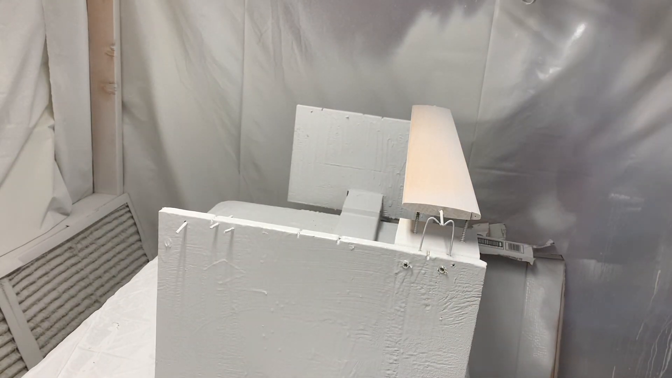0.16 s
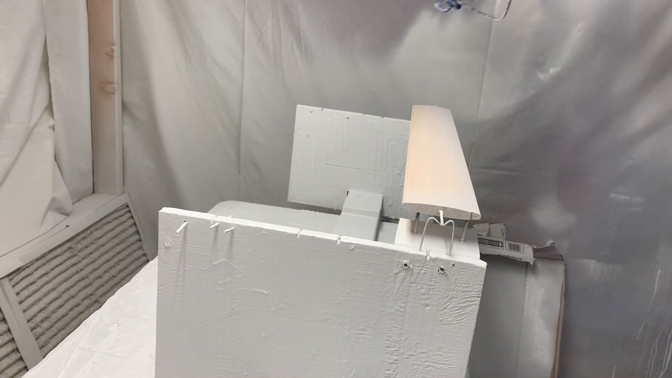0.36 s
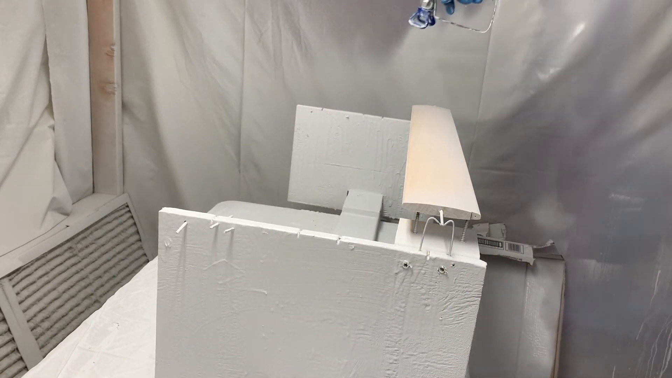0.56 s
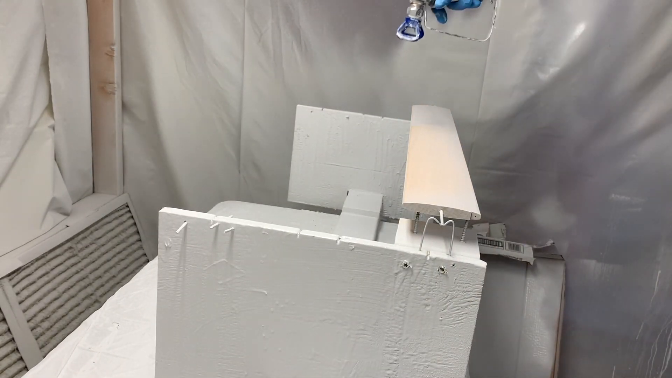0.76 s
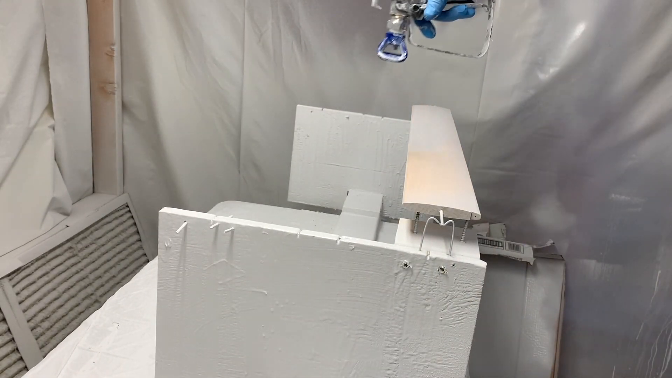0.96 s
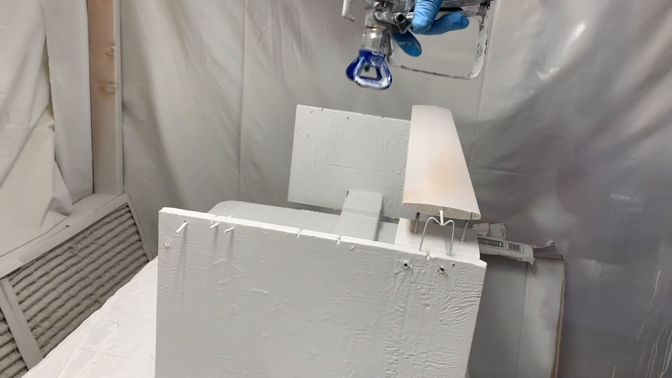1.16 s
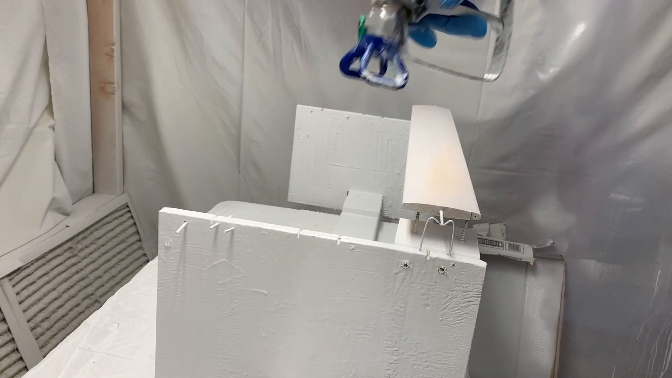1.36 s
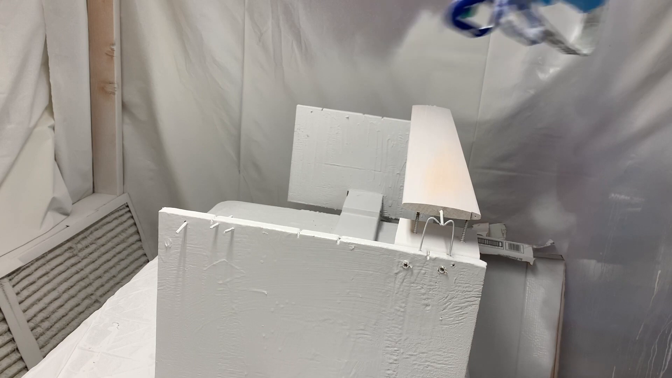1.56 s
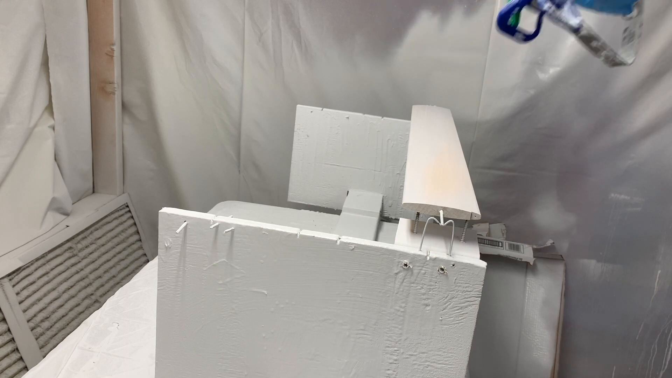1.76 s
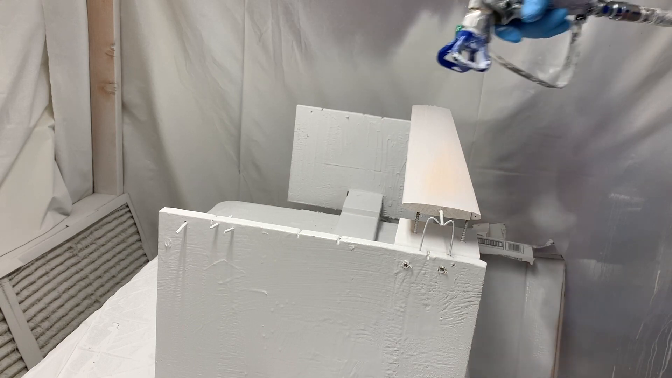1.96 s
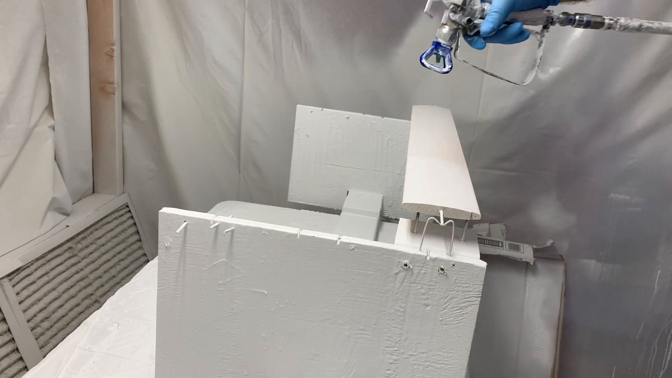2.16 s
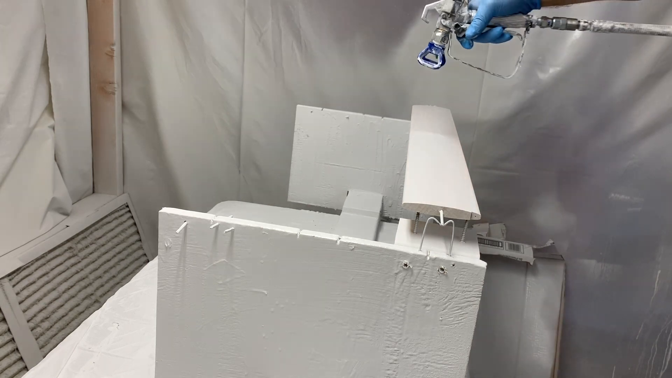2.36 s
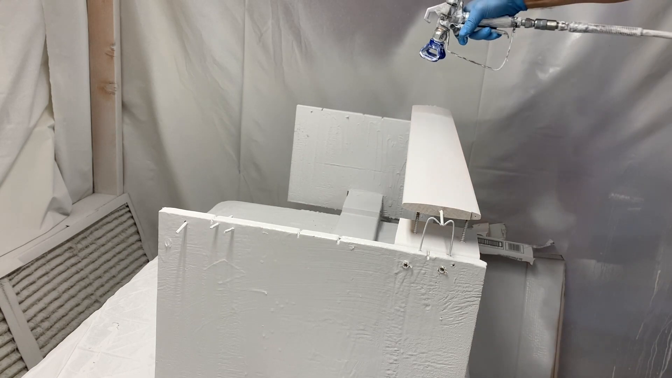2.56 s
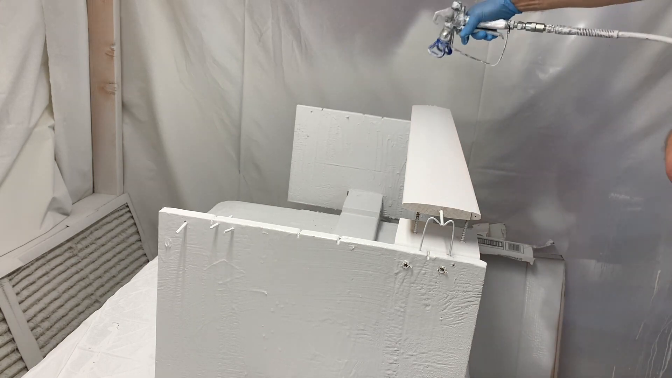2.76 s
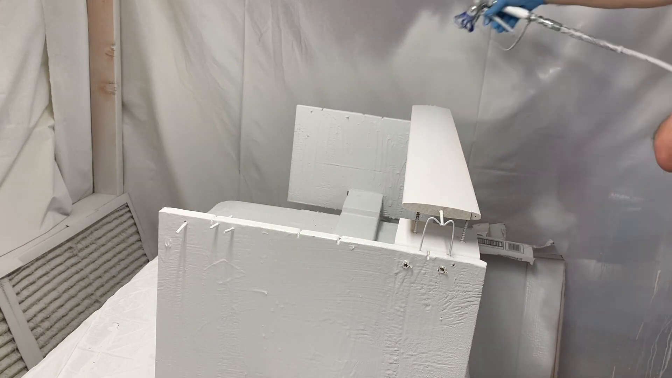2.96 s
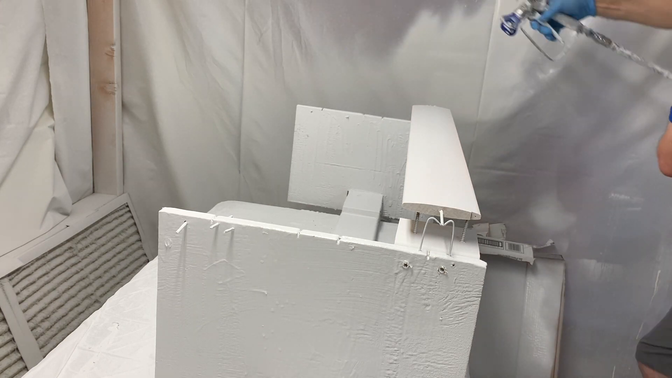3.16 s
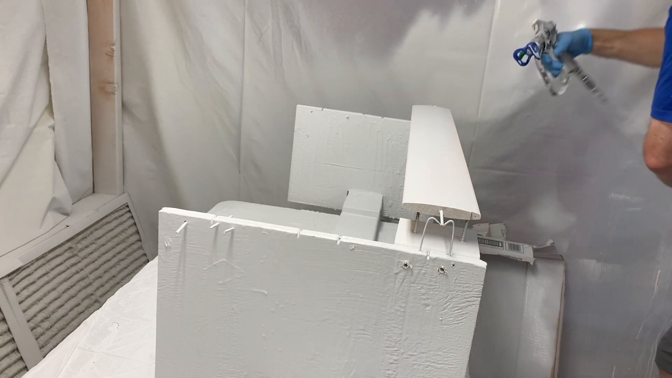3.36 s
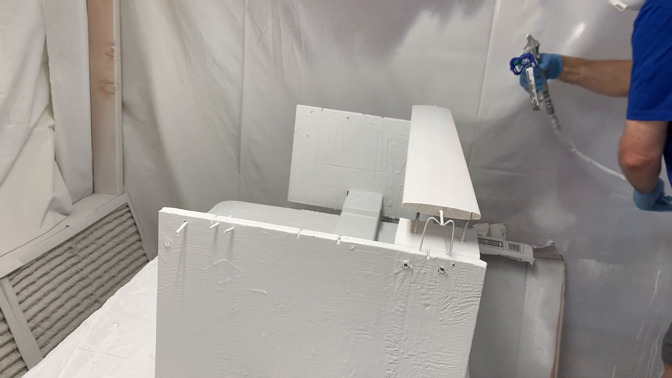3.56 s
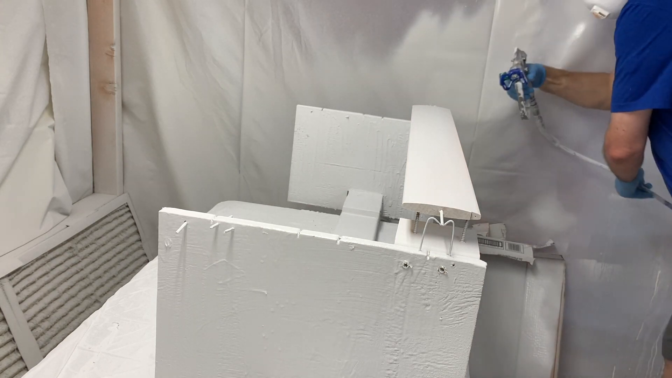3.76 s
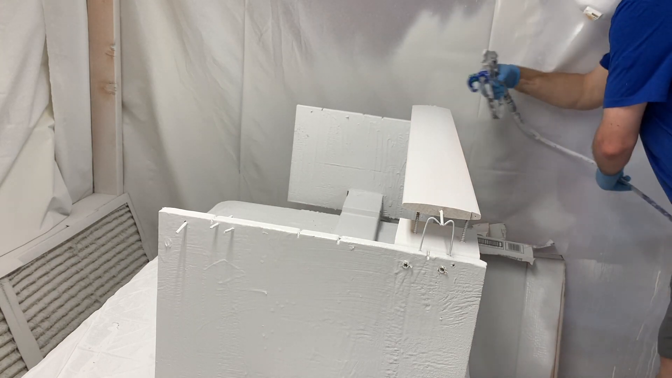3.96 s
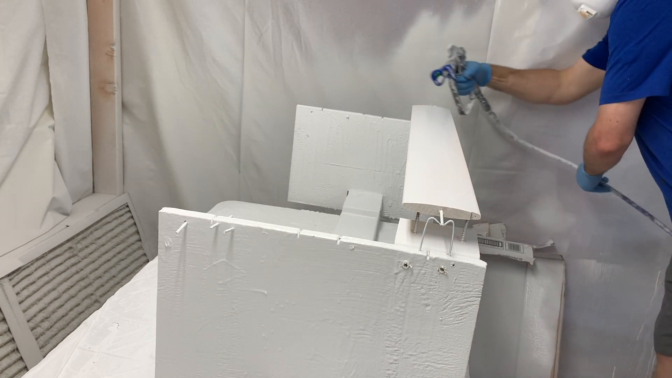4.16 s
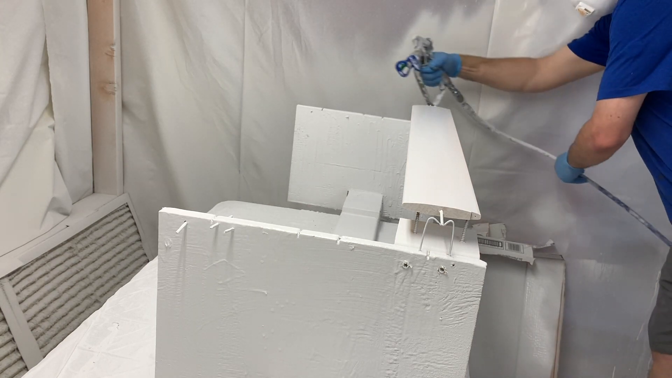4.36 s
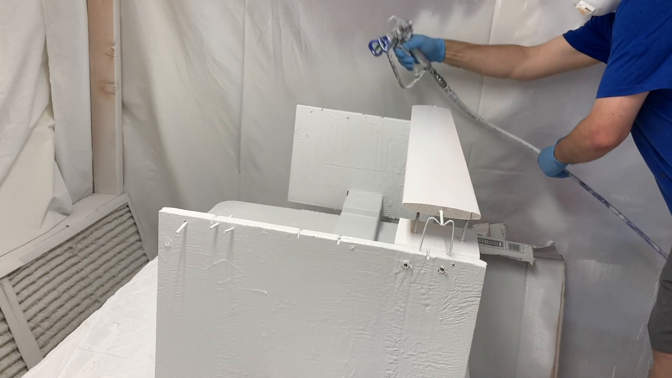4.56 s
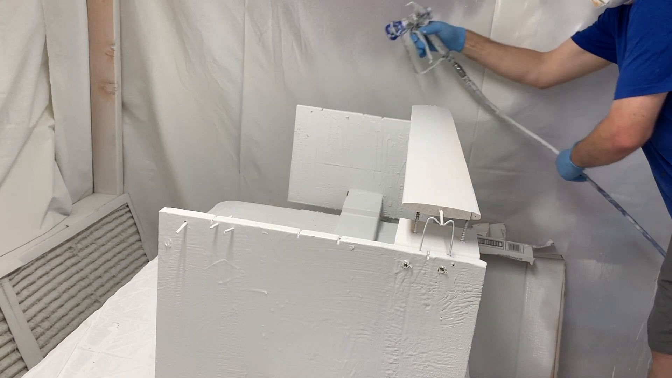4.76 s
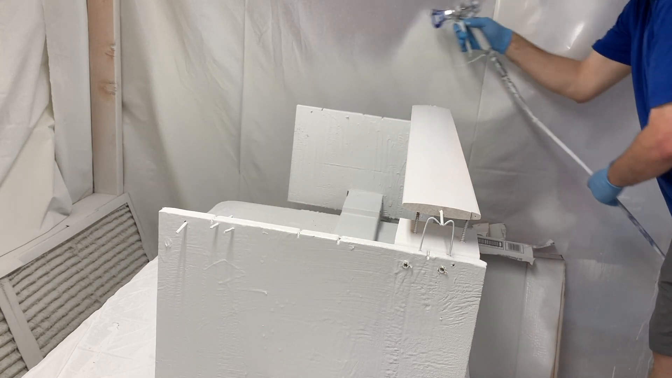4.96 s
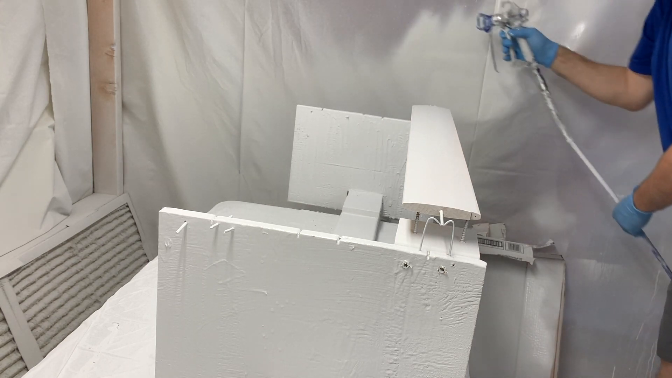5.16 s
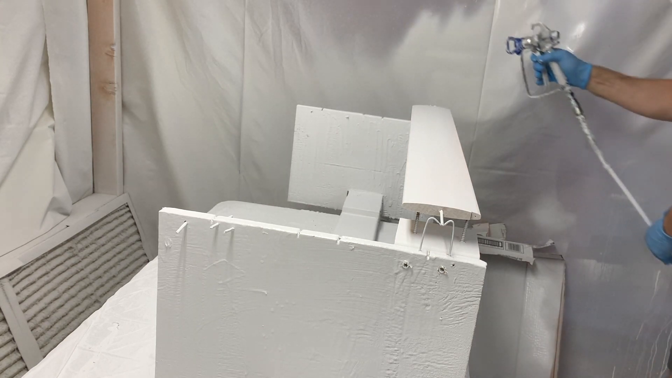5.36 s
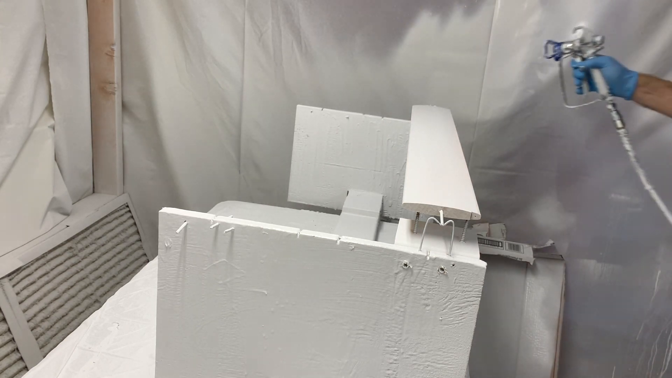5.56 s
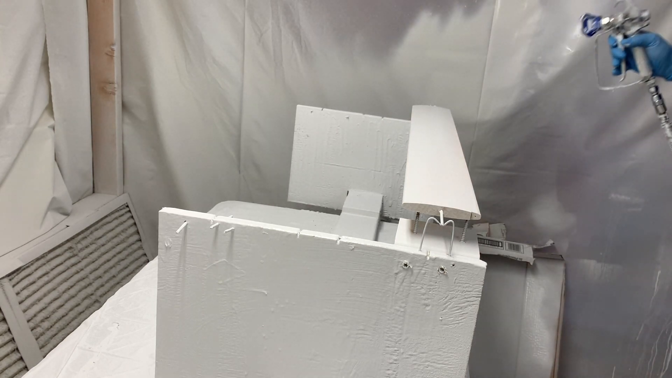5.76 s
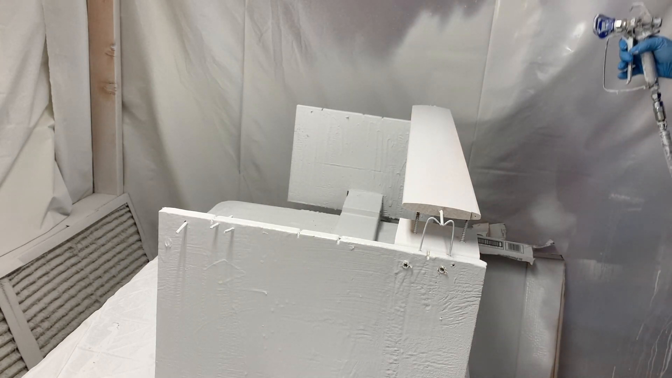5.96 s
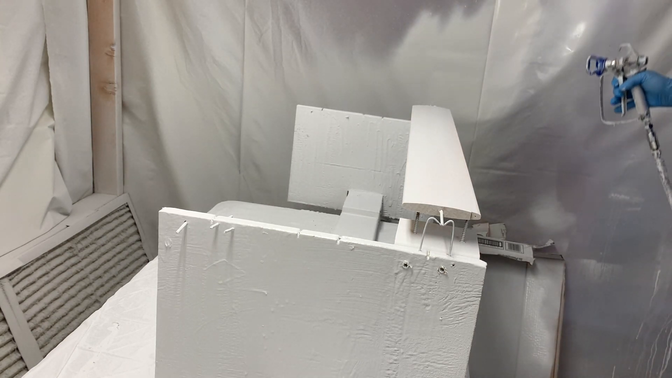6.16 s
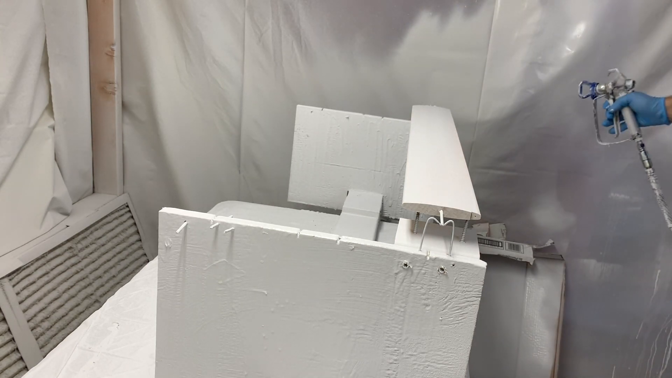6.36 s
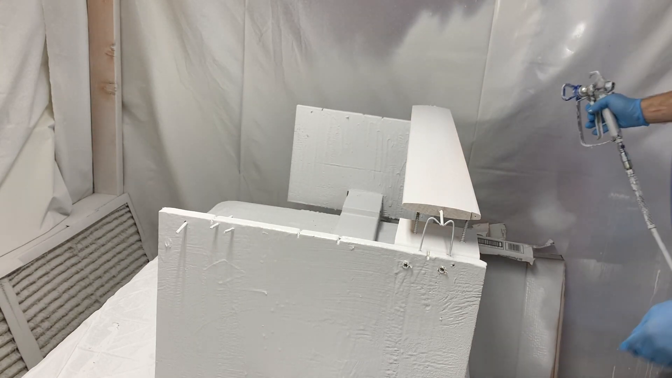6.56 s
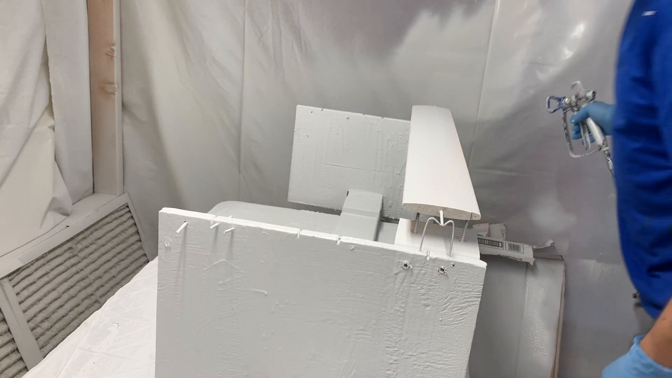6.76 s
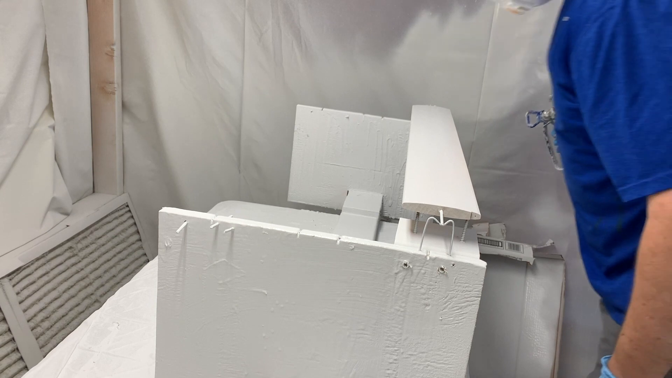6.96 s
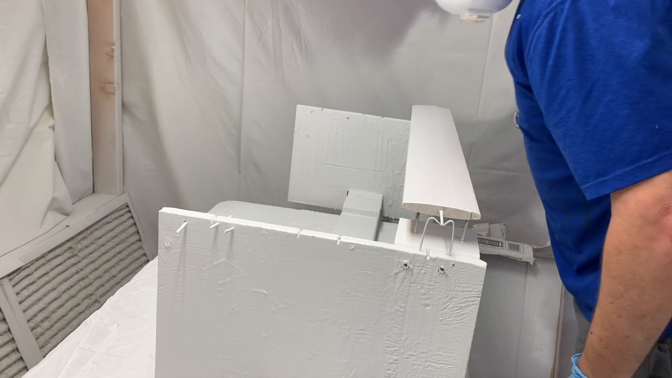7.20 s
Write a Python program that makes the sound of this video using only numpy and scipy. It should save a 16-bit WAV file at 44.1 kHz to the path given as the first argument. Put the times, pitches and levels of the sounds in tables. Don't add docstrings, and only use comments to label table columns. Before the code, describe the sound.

In a plastic-lined booth with a steady fan hum, sharp spray jets start and stop, drumming a board, followed by hose knocks, rustles and trigger clicks.

```python
import sys
import numpy as np
from scipy import signal
from scipy.io import wavfile
from scipy.ndimage import uniform_filter1d

SR = 44100
rng = np.random.default_rng(int(sys.argv[2]) if len(sys.argv) > 2 else 0)


def pcm_store(signal):
    levels = np.round(np.clip(np.atleast_2d(signal), -1, 1) * 32767)
    wavfile.write(sys.argv[1], SR, levels.astype(np.int16).T)


def attenuation_scalar(level_db):
    decades = np.asarray(level_db, float) / 20
    return 10 ** decades


N = 318843
T = np.arange(N) / SR

# (time [s], level over the jet [dB])
SPURTS = [
    (.3125, 5.),
    (1.8165, 8.),
    (3.9865, 10.),
]
# (time [s], level [dB], pitch [Hz], decay by 60 dB [s])
CLICKS = [
    (3.837, -46, 4000, .05),
    (3.9033, -27, 1300, 0.09),
    (6.2235, -40, 3300, 0.03),
]


def jet():
    # (open [s], rise [s], shut [s], dying [dB/s], treble gained while dying [dB/octave/s])
    passes = [
        (0.313, 0.018, 1.412, 704, 200),
        (1.8179, 0.0066, 2.85, 260, 7),
        (3.9875, 0.04, 4.62, 285, 15),
    ]
    # (time [s], level [dB])
    nearness = [(0.3, -30.5), (1.08, -27.5), (1.38, -23), (1.45, -26), (2.04, -24), (2.08, -27.5),
                (2.44, -29), (2.57, -28.5), (4.05, -28.5), (4.24, -26.5), (4.36, -28), (4.6, -28)]
    # (frequency [Hz], level [dB])
    hiss = [(300, -32), (1000, -29.5), (2000, -25.5), (3000, -20.5), (4500, -17), (6000, -10), (8000, -6.5),
            (11000, -2), (14000, -0.5), (15800, 2)]
    cracked_open_db, dribble_db, dribble_fall_db_per_s = -10, -22, 180
    tilt = -1.68
    gains = []
    for start, rise, shut, fall_db, thinning in passes:
        gains.append(attenuation_scalar(held_db(start, rise, shut, fall_db, cracked_open_db)))
        gains.append(attenuation_scalar(dribble_db + held_db(shut, .01, shut, dribble_fall_db_per_s, 0)))
        dying = (T > shut) & (T < shut + .2)
        tilt = tilt + thinning * (T - shut) * dying
    level_db = np.interp(T, *np.transpose(nearness)) + summed_db(np.array(gains), -120)
    for s, db in SPURTS:
        level_db = level_db + db * (T >= s) * np.exp(-np.abs(T - s) / .012)
    droplets = grains(2500, 2.4, 0.19)
    spray = coloured(droplets, hiss, size=256, tilt=np.clip(tilt, -3, 14), pivot_hz=10500, patchy_db=0.32)
    return attenuation_scalar(level_db + 7.5) * spray


def board():
    # (lands [s], rise [s], leaves [s], level [dB], fading [dB/s])
    strikes = [
        (0.62, 0.078, 1.08, -33.5, 93),
        (2.399, 0.059, 2.756, -33, 61),
    ]
    # (frequency [Hz], width [Hz], level [dB])
    mode_table = [(380.5, 25, -2.5), (540, 76, -2), (807, 210, 0), (1025, 260, 5), (1184, 87, 2),
                  (1610, 53, -19.5), (1830, 34, -30), (2350, 170, -28), (2950, 250, -13), (3860, 570, -44)]
    # (time [s], frequency [Hz])
    glide = [
        [(.66, 1590), (.755, 1580), (.81, 1730), (.855, 1690), (.91, 1430), (.95, 1210), (1.04, 1080),
         (1.13, 1210), (1.2, 1100)],
        [(2.43, 1520), (2.51, 1610), (2.55, 1830), (2.585, 1740), (2.62, 1610), (2.67, 1280), (2.73, 1140),
         (2.83, 1200), (2.93, 1030)],
    ]
    # (peak [s], singing level [dB], rise [s], fall [s])
    gust_table = [
        (0.676, -39, 0.019, 0.045),
        (0.754, -29.5, 0.0093, 0.2),
        (0.848, -21.5, 0.029, 0.078),
        (0.96, -25, 0.024, 0.023),
        (2.512, -26, 0.028, 0.014),
        (2.565, -26, .03, 0.037),
        (2.616, -22.5, 0.025, 0.0085),
        (2.642, -25, 0.0068, 0.038),
        (2.716, -28, .016, .11),
    ]
    landing_db, sing_db, gust_share = -18.5, -6.5, 0.45
    body_db, body_fade_db_per_s = 2.5, 11.5
    blow = sum(attenuation_scalar(db + held_db(start, rise, end, fall_db, landing_db))
               for start, rise, end, db, fall_db in strikes)
    since_landing = np.min([np.where(T > row[0], T - row[0], 9) for row in strikes], axis=0)
    surge = np.sqrt((swells(gust_table) ** 2).sum(0))
    flutter = evened(uniform_filter1d(uniform_filter1d(rng.standard_normal(N), 500), 500))
    drive = rng.standard_normal(N) * attenuation_scalar(2.2 * flutter)
    modes = [attenuation_scalar(db) * evened(ring(drive, hz, width)) for hz, width, db in mode_table]
    note_hz = np.interp(T, *np.concatenate(glide).T)
    note = evened(resonate(resonate(drive, note_hz, 110), note_hz, 300))
    steady = blow + gust_share * uniform_filter1d(surge, 2500)
    panel = 0.32 * steady * sum(modes[3:])
    body = attenuation_scalar(body_db - body_fade_db_per_s * since_landing) * 0.61 * blow * sum(modes[:3])
    return np.hypot(attenuation_scalar(sing_db) * blow, surge) * note + panel + body


def rustle():
    # (peak [s], level [dB], rise [s], fall [s], brightness [dB/octave])
    rub_table = [(0.012, -53, 0.044, 0.067, 4), (0.166, -67, .1, 0.22, -7), (1.45, -62, .02, 0.13, 10),
                 (1.642, -54.5, 0.062, 0.12, 0), (1.792, -63, .07, .04, -3),
                 (3.022, -39, 0.013, 0.048, 1.5), (3.194, -46, 0.088, 0.031, -1.5),
                 (3.356, -49, 0.064, 0.053, 0), (3.542, -54.5, 0.11, 0.14, -1),
                 (3.842, -50, 0.01, 0.26, -1.5), (3.91, -53, 0.054, 0.063, -8),
                 (4.87, -63, 0.14, 0.44, 5.5), (5.06, -64, .09, 0.14, 12), (5.34, -46.5, 0.12, 0.21, 1),
                 (5.62, -45.5, 0.032, .1, -4), (5.68, -41, .1, .14, 0), (5.81, -41, 0.065, 0.084, -1),
                 (6.229, -51, .004, 0.044, -6.5), (6.59, -58.5, 0.028, .05, 0), (6.72, -60, .02, 0.098, 1),
                 (6.78, -60, .025, 0.049, -2), (7.05, -74, 0.089, .3, -10), (7.23, -60, 0.026, .05, -1.5)]
    # (frequency [Hz], level [dB])
    plastic = [(250, -36), (800, -2), (2000, 1), (4000, 1.5), (7000, 0.5), (11000, -5), (15800, -7)]
    rubs = swells(rub_table)
    rub_db = summed_db(rubs, -71)
    bright = np.array(rub_table)[:, -1] @ rubs ** 2 / attenuation_scalar(2 * rub_db)
    crackle = grains(882, 1.56, 1.0)
    return attenuation_scalar(rub_db + 7.5) * coloured(crackle, plastic, size=256, tilt=bright, pivot_hz=6840, patchy_db=0.5)


def knocks():
    # (time [s], level [dB], pitch [Hz], decay by 60 dB [s])
    thuds = [
        (1.245, -24.5, 197, 0.16),
        (1.266, -21, 190, 0.076),
        (1.288, -21, 290, 0.07),
        (4.19, -33.5, 264, 0.66),
        (4.29, -38.5, 400, .9),
        (4.41, -30, 210, 0.27),
        (5.789, -28, 35, 0.17),
        (6.23, -33, 202, 0.27),
    ]
    out, t = np.zeros(N + SR), T[:SR // 2]
    for s, db, hz, t60 in CLICKS:
        puff = rng.standard_normal(len(t)) * attenuation_scalar(-60 * t / t60)
        chirp_s = t + .0006 * (1 - np.exp(-t / .0006))
        tick = 3.5 * np.sin(2 * np.pi * hz * chirp_s) * np.exp(-t / .0012)
        click = tick + 2.6 * ring(puff, hz, 0.9 * hz) + 0.06 * puff
        out[round(s * SR):][:len(t)] += attenuation_scalar(db) * click
    for s, db, hz, t60 in thuds:
        body = evened(ring(ring(rng.standard_normal(len(t)), hz, .8 * hz), hz, 1.2 * hz))
        out[round(s * SR):][:len(t)] += attenuation_scalar(db - 60 * t / t60) * body * np.tanh(t / .015)
    return out[:N]


def fan():
    # (frequency [Hz], level [dB])
    roar = [(20, -43), (45, -9.5), (62, -6), (100, -10.5), (130, -8.5), (215, -7), (260, -8), (450, -7.5),
            (560, -12.5), (1280, -15.5), (2500, -24), (4400, -30.5), (7000, -39), (11000, -57),
            (15800, -66)]
    # (frequency [Hz], width [Hz], level [dB], steady share [0-1])
    hum = [(46.3, 41.7, -59, 0), (78.4, 4.6, -47, 0.89), (155, 3.3, -43.5, 0.5), (207.7, 21.6, -44.5, 0.48),
           (377.5, 21, -54.5, 0.66)]
    # (peak [s], level [dB])
    buffets = [(0.1, -47), (0.5, -52), (2.29, -40), (2.6, -41), (3.04, -47), (4.2, -50), (4.75, -40),
               (5.17, -37.5), (5.78, -41), (6.12, -41), (6.7, -56), (7.13, -47)]
    push_s, ease_s, calm_db = 0.09, 0.11, -60.5
    out = attenuation_scalar(-38) * coloured(rng.standard_normal(N), roar, size=2048, patchy_db=2.0)
    for hz, width, db, steady in hum:
        waver = evened(ring(ring(rng.standard_normal(N), hz, width), hz, 4 * width))
        tone = np.sin(2 * np.pi * hz * T + 0.52 * waver)
        out += attenuation_scalar(db) * ((1 - steady) * waver + 2.05 * steady * tone)
    push = evened(ring(ring(rng.standard_normal(N), 31.9, 24.6), 32, 25.3))
    push_db = summed_db(swells([(s, db, push_s, ease_s) for s, db in buffets]), calm_db)
    return out + attenuation_scalar(push_db - 1.5) * push


def booth(x):
    tail = rng.standard_normal(SR // 3) * attenuation_scalar(-60 * T[:SR // 3] / 0.24)
    return x + attenuation_scalar(-7.5) * signal.oaconvolve(x, tail / np.linalg.norm(tail))[:N]


def evened(x):
    return x / np.sqrt(np.mean(x ** 2) + 1e-20)


def read(points, hz):
    f, value = np.transpose(points)
    return np.interp(np.log(hz + 1), np.log(f + 1), value)


def ring(x, hz, width):
    return signal.lfilter(*signal.iirpeak(hz, hz / width, SR), x)


def resonate(x, hz, width):
    turn = np.exp(2j * np.pi * np.cumsum(hz * np.ones(len(x))) / SR)
    r = np.exp(-np.pi * width / SR)
    return 2 * (turn * signal.lfilter([1 - r], [1, -r], x / turn + 1e-18)).real


def coloured(x, spectrum, size, tilt=0, pivot_hz=1000, patchy_db=0):
    hz, t, z = signal.stft(x, SR, nperseg=size, noverlap=size * 3 // 4)
    shape = attenuation_scalar(read(spectrum, hz))[:, None]
    patches = evened(uniform_filter1d(uniform_filter1d(rng.standard_normal(z.shape), 5, 0), 24, 1))
    octaves = np.log2(np.maximum(hz[:, None], 1500) / pivot_hz)
    slope_db = octaves * np.interp(t, T, tilt + 0 * T)
    gain = attenuation_scalar(np.clip(slope_db, -30, 30) + patchy_db * patches)
    z = z * shape / np.sqrt(np.mean(shape ** 2)) * gain
    return signal.istft(z, SR, nperseg=size, noverlap=size * 3 // 4)[1][:N]


def grains(per_s, spread_db, share):
    ticks = attenuation_scalar(spread_db * np.minimum(rng.exponential(1, N), 5)) * (rng.random(N) < per_s / SR)
    return evened(rng.standard_normal(N) + share * evened(ticks * rng.choice([-1, 1], N)))


def swells(rows):
    return np.array([attenuation_scalar(db - 13 * np.maximum((s - T) / rise, (T - s) / fall))
                     for s, db, rise, fall, *_ in rows])


def summed_db(gains, floor_db):
    return 10 * np.log10((gains ** 2).sum(0) + attenuation_scalar(2 * floor_db))


def held_db(start, rise, end, fall_db, from_db):
    shape = from_db * np.clip(1 - (T - start) / rise, 0, 1) - fall_db * np.maximum(T - end, 0)
    return np.where(T < start, -150, np.maximum(shape, -150))


def starve(x):
    # (from [Hz], to [Hz], bin level [dB], band level [dB])
    starved = (1701.5, 5800, -12.5, -13)
    # (from [Hz], band level [dB])
    hush = (10000, -103)
    lead = 342
    frames = dict(window="cosine", nperseg=2048, noverlap=1024)
    pair = np.pad(np.array([x[0] + x[1], x[0] - x[1]]) / 2, ((0, 0), (lead, 0)))
    hz, _, z = signal.stft(pair, SR, **frames)
    hz, power = hz[:1024, None], np.abs(z[:, :1024]) ** 2
    treble = power[:, 280:740].mean((0, 1))
    bands = power.reshape(2, 128, 8, -1).mean(2)
    bands = np.repeat(bands * attenuation_scalar(6. * rng.standard_normal(bands.shape)), 8, axis=1)
    lo_hz, hi_hz, bin_db, band_db = starved
    hush_hz, hush_db = hush
    faint_bin = power < treble * attenuation_scalar(2 * bin_db) * (hz / 3500) ** 1.5
    faint_band = (bands < treble * attenuation_scalar(2 * band_db)) & (hz > 3900)
    masked = (faint_bin | faint_band) & (hz > lo_hz) & (hz < hi_hz)
    silent = (bands < attenuation_scalar(2 * hush_db)) & (hz > hush_hz)
    z[:, :1024] *= ~(masked | silent)
    mid, side = signal.istft(z, SR, **frames)[1][:, lead:][:, :N]
    return np.array([mid + side, mid - side])


def scene():
    x = booth(jet() + board() + rustle() + knocks()) + fan()
    return np.array([x, x])


def top_cut(x):
    return signal.sosfilt(signal.butter(12, 17040, fs=SR, output="sos"), x)


def record(dry):
    # (frequency [Hz], lag [turns])
    right_lag = [(0, 0), (1000, -.05), (2000, .07), (3500, .2), (4880, .5), (6900, 1.0), (15500, 3.0),
                 (22050, 4.5)]
    # (frequency [Hz], likeness [0-1])
    likeness = [(100, 1), (400, 0.93), (900, 0.47), (2000, 0.7), (3000, 0.11), (5000, 0.3), (16000, 0)]
    # (time [s], width [s], level [dB])
    falter = (6.4425, .0042, -18)
    edge_hz = 15800
    hz, t, z = signal.stft(dry[0], SR, nperseg=512, noverlap=384)
    sudden = sum(np.abs(t - row[0] - .008) < .009 for row in SPURTS + CLICKS[-1:]) > 0
    half_turns = 2 * np.interp(hz, *np.transpose(right_lag))[:, None]
    margin = np.where(half_turns < 1.5, .05, .19) * ~sudden
    free = np.clip((half_turns % 1 - margin) / (1 - 2 * margin), 0, 1)
    high = half_turns > .5
    lag = np.pi * np.where(high, np.floor(half_turns) + free, half_turns)
    apart = np.sqrt((1 - np.clip(read(likeness, hz), 0, 1)) / 2)[:, None]
    unlocked = np.where(high, np.abs(np.sin(np.pi * free)) ** .5, 1)
    share = apart * unlocked * np.where(sudden, .3, 1)
    scatter = 1.91 * share * np.exp(2j * np.pi * rng.random(z.shape))
    shared = np.sqrt(1 - share ** 2)
    left = (shared + scatter) * attenuation_scalar(0.58 * (hz < 500))[:, None]
    right = (shared - scatter) * np.exp(-1j * lag)
    edge = attenuation_scalar(-np.clip(hz - edge_hz, 0, 500) * .25)[:, None]
    edge = np.maximum(edge, attenuation_scalar(-25) * sudden * (hz < 16800)[:, None])
    pair = signal.istft(z * edge * np.array([left, right]), SR, nperseg=512, noverlap=384)[1][:, :N]
    s, width, db = falter
    mix = starve(pair) * attenuation_scalar(db * np.exp(-((T - s) / width) ** 2))
    return top_cut(mix)


dry = scene()
out = record(dry)
pcm_store(out)
```